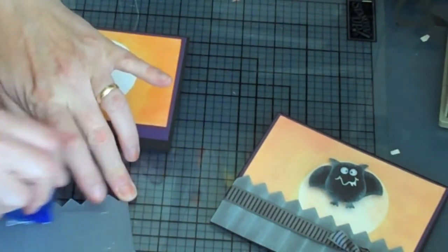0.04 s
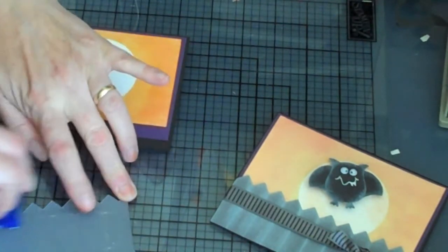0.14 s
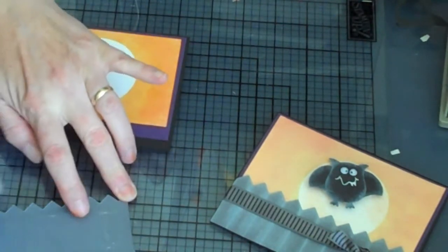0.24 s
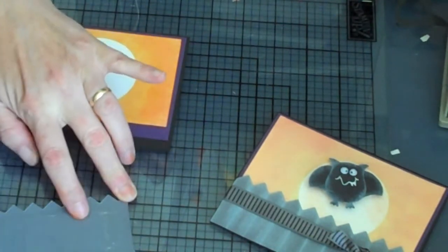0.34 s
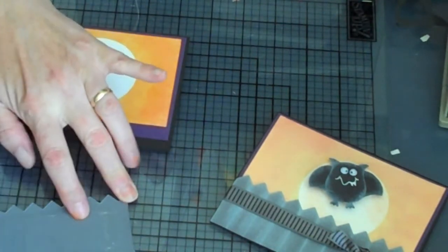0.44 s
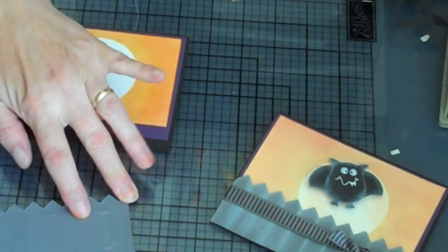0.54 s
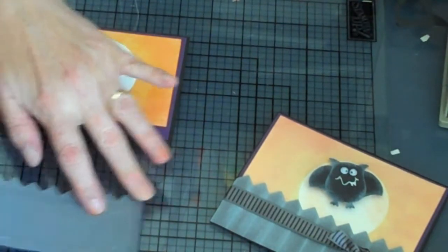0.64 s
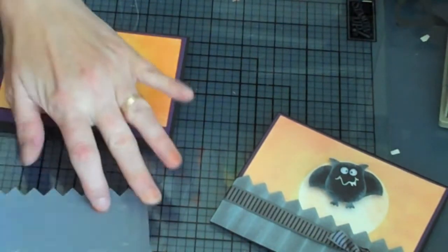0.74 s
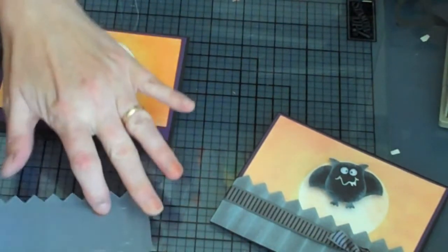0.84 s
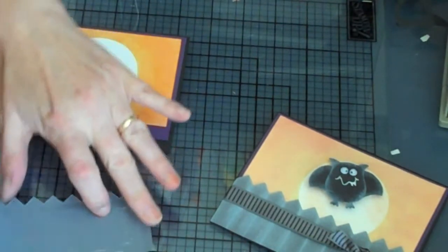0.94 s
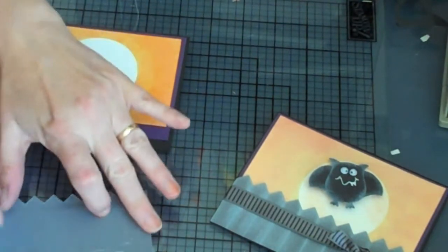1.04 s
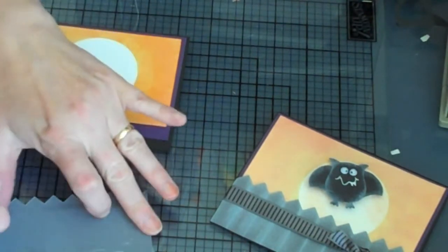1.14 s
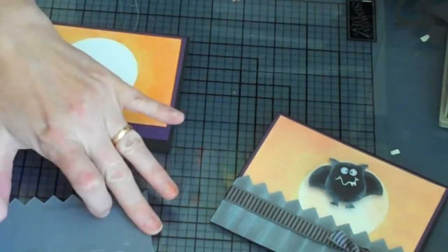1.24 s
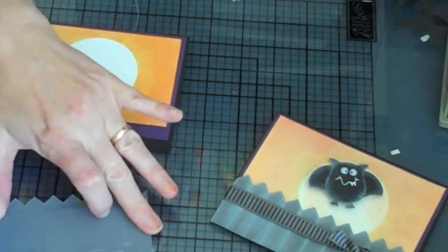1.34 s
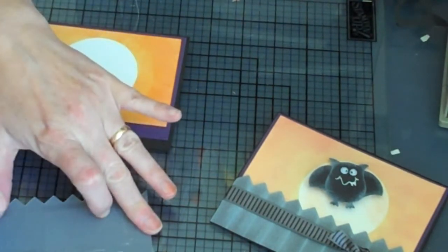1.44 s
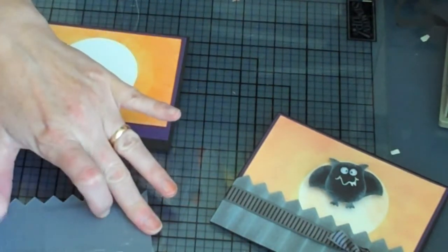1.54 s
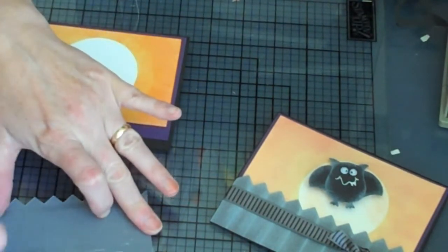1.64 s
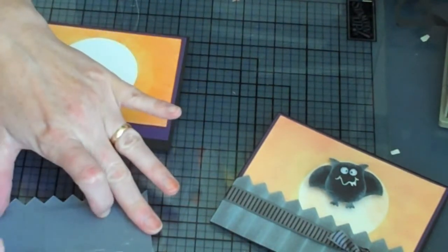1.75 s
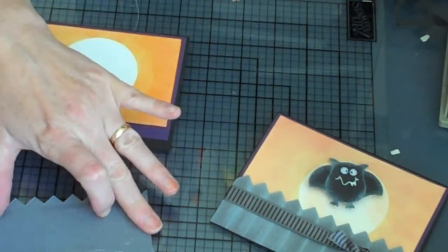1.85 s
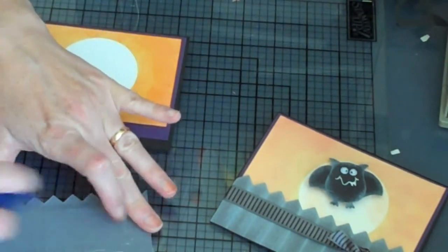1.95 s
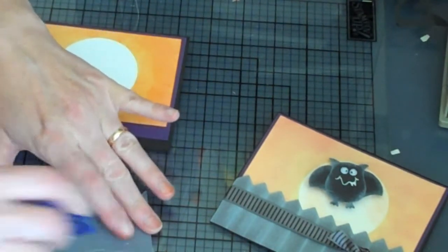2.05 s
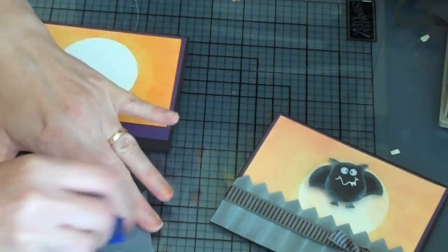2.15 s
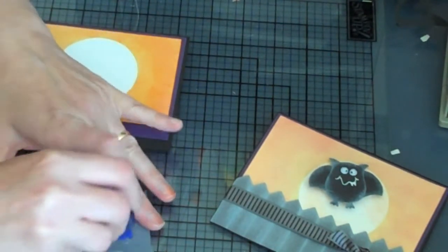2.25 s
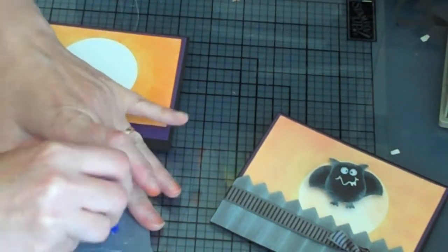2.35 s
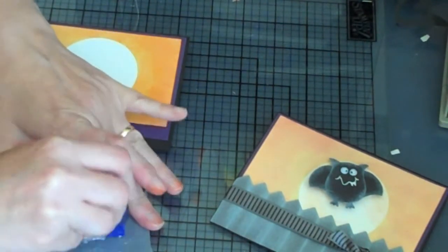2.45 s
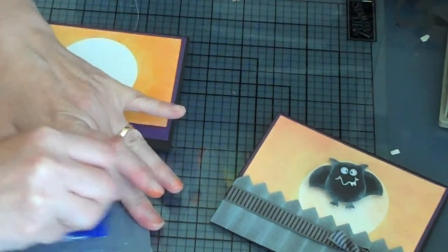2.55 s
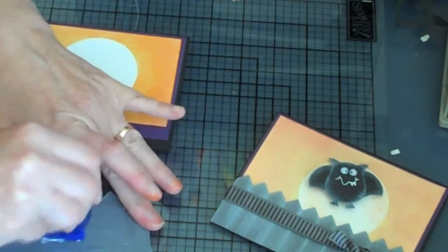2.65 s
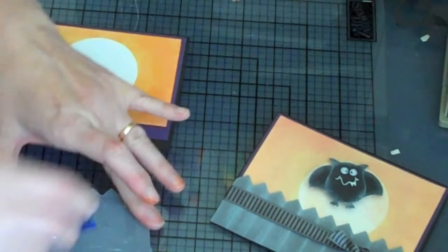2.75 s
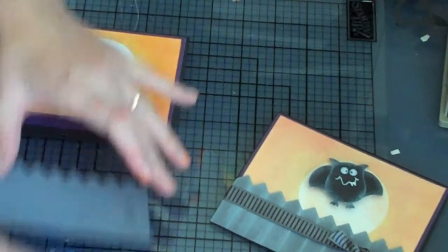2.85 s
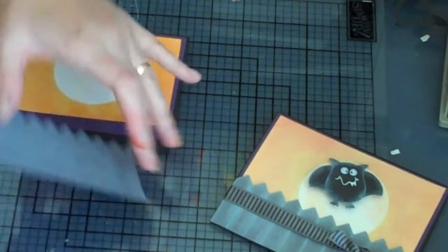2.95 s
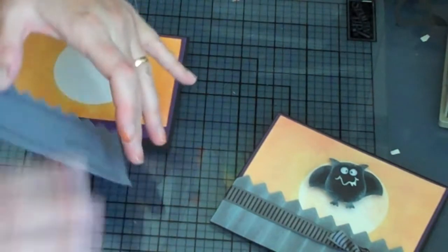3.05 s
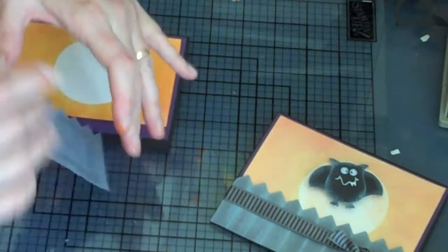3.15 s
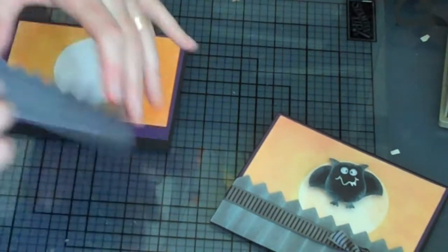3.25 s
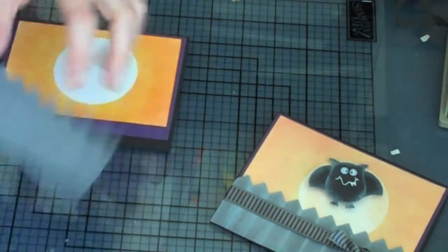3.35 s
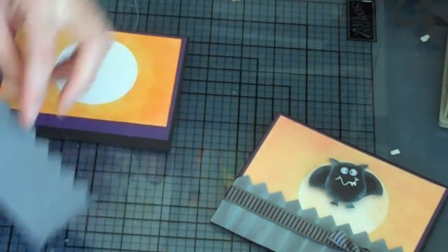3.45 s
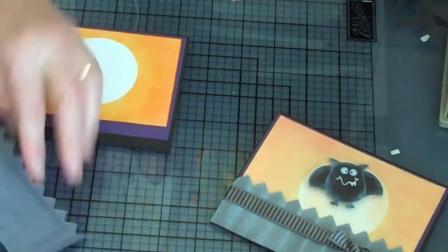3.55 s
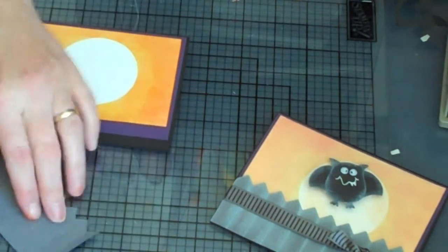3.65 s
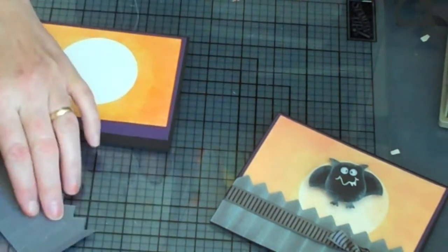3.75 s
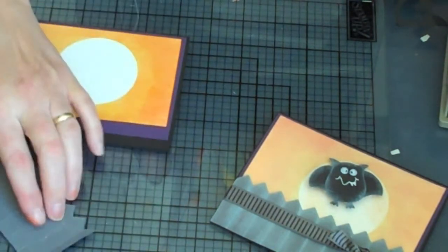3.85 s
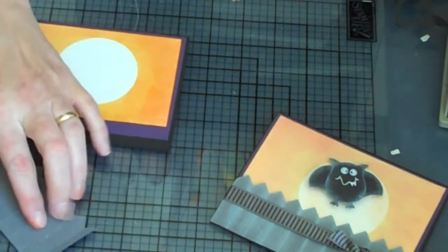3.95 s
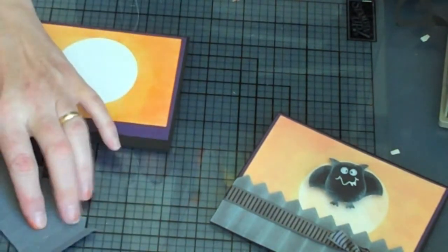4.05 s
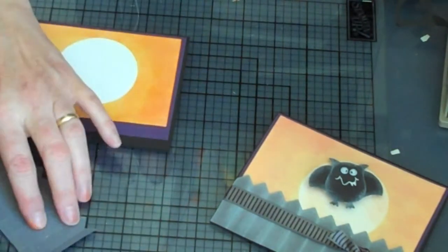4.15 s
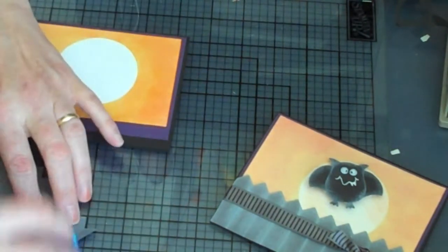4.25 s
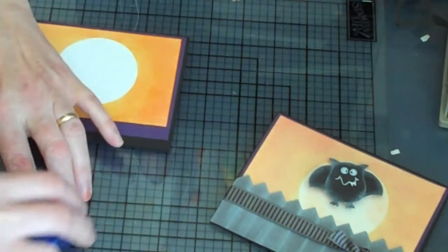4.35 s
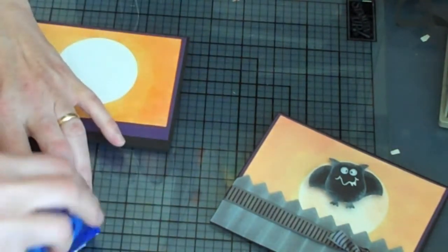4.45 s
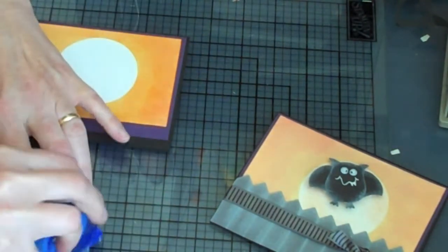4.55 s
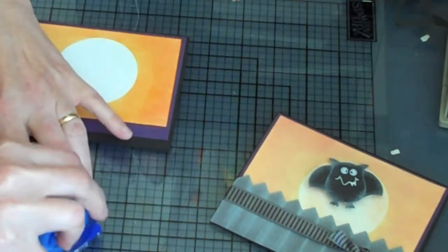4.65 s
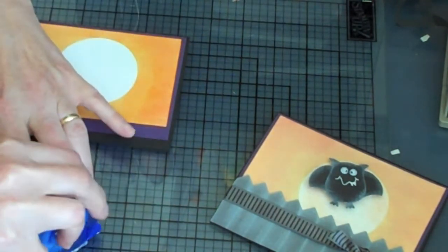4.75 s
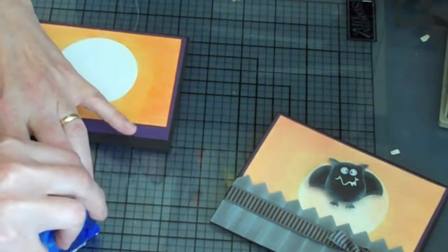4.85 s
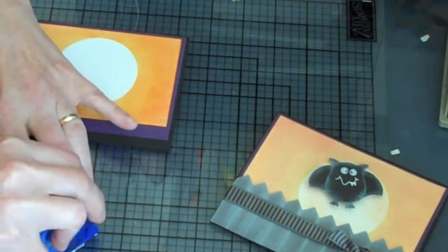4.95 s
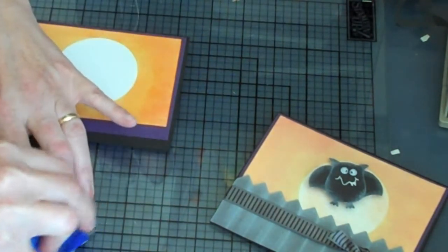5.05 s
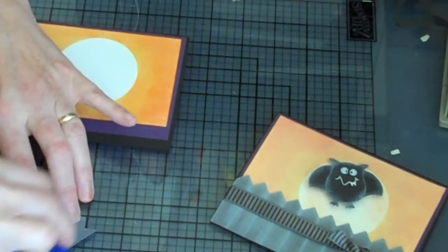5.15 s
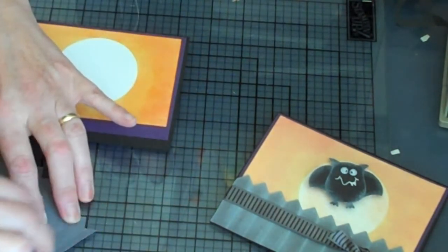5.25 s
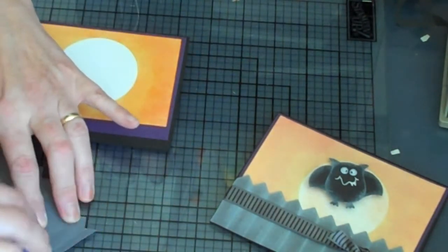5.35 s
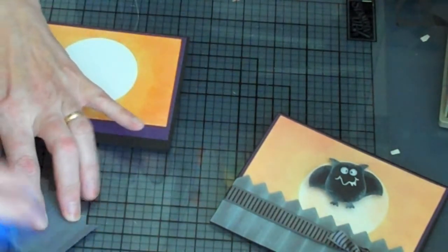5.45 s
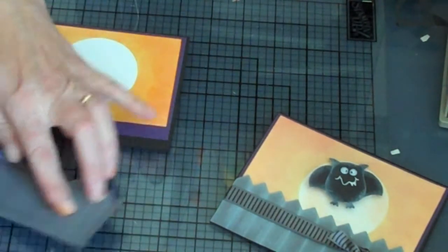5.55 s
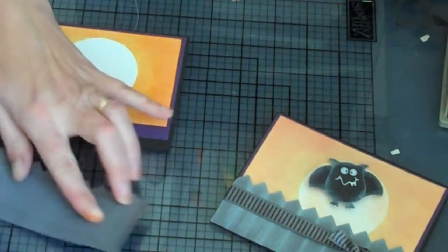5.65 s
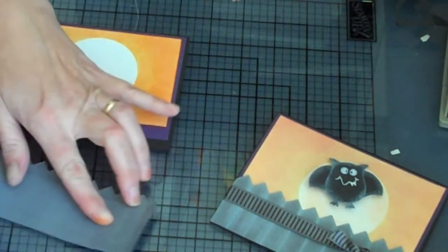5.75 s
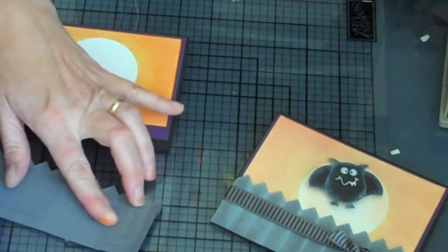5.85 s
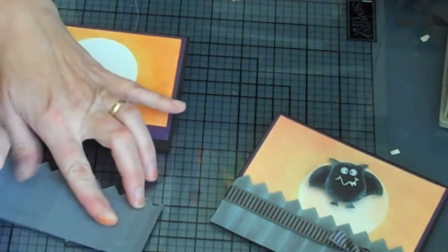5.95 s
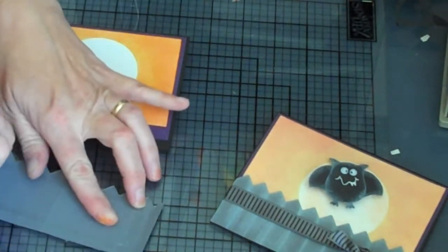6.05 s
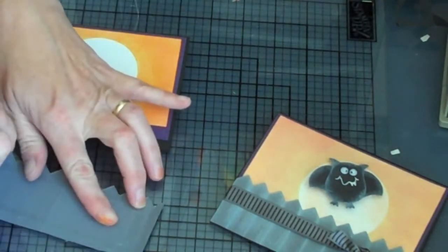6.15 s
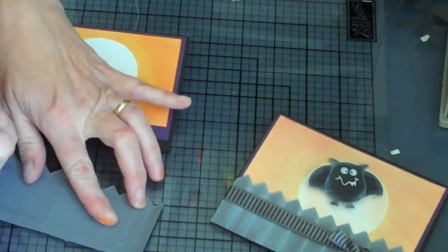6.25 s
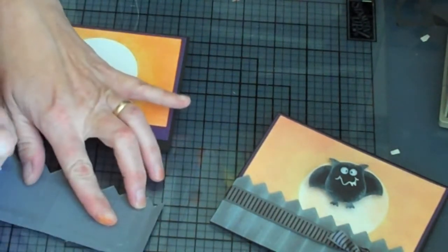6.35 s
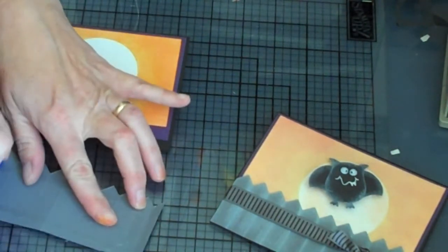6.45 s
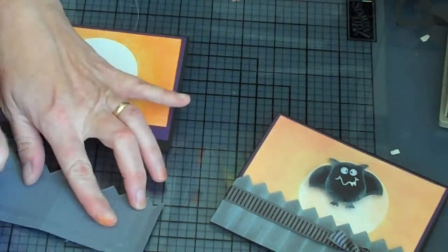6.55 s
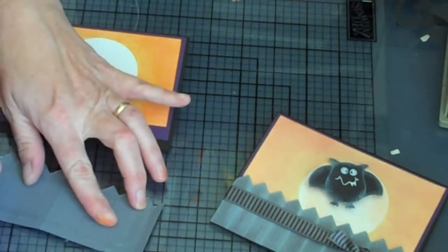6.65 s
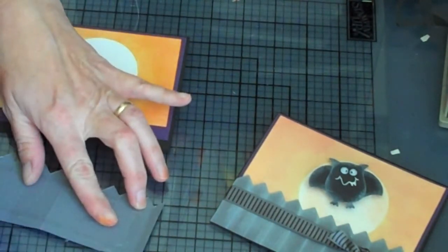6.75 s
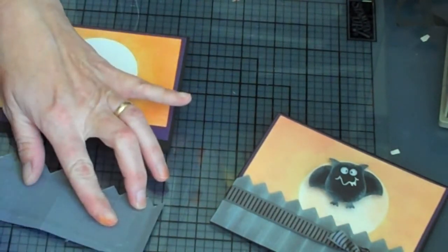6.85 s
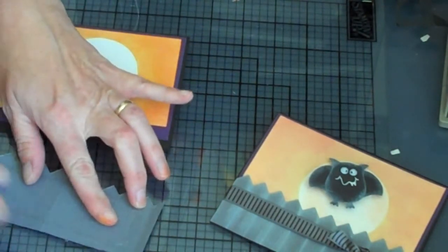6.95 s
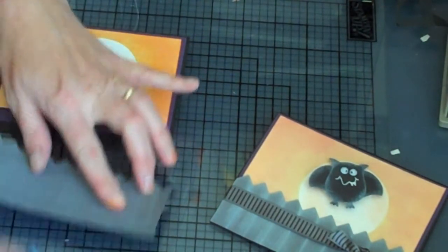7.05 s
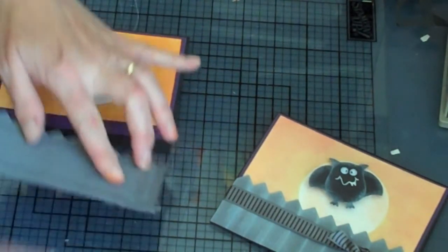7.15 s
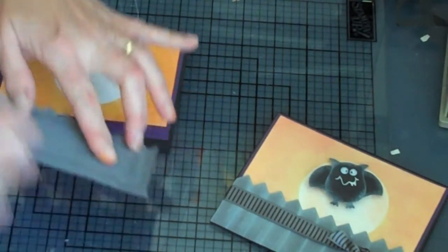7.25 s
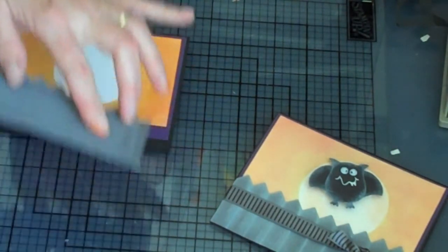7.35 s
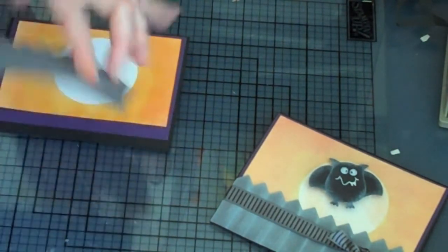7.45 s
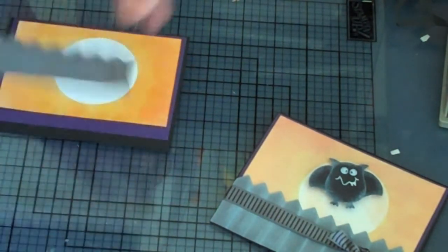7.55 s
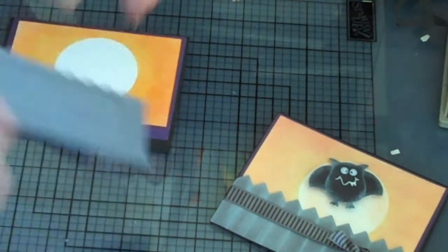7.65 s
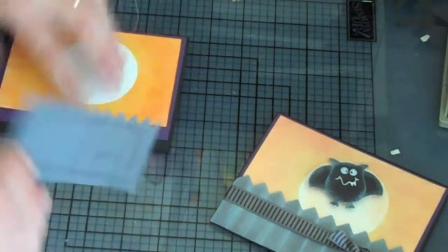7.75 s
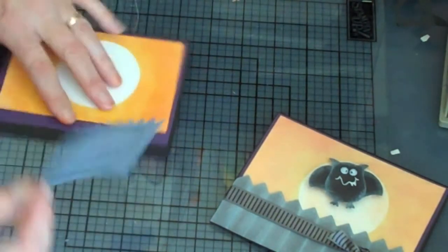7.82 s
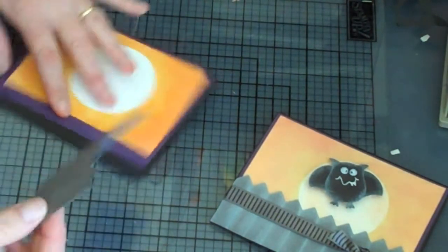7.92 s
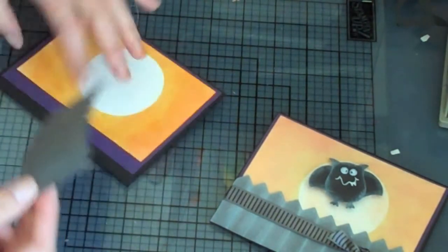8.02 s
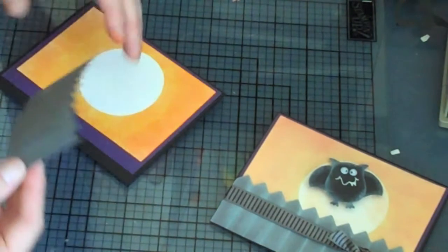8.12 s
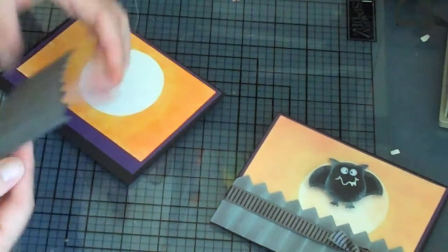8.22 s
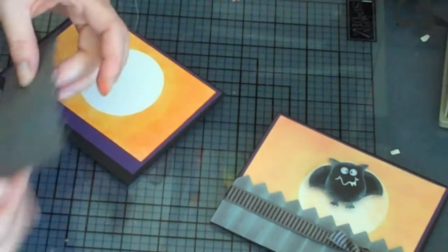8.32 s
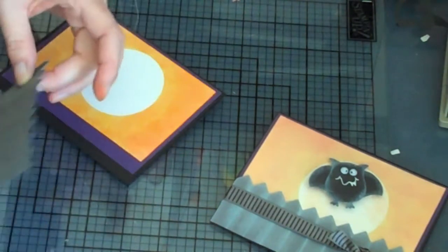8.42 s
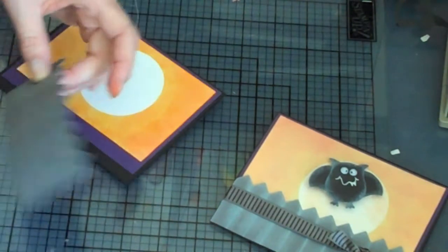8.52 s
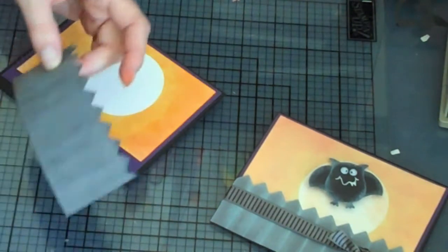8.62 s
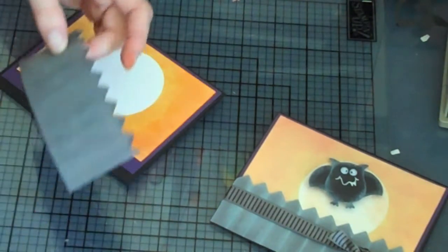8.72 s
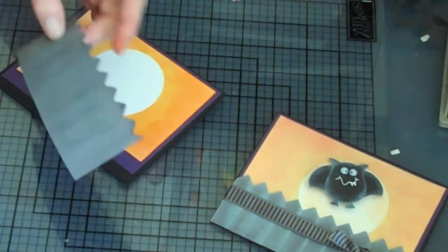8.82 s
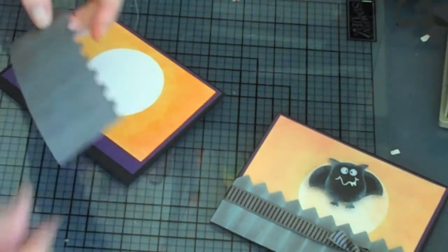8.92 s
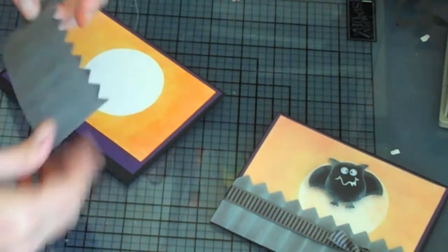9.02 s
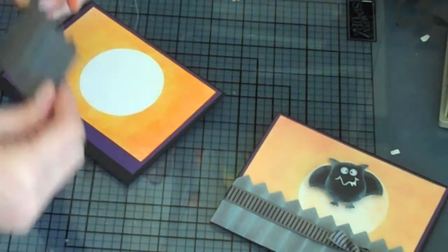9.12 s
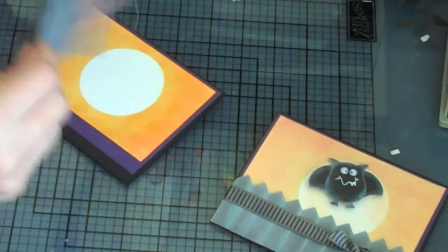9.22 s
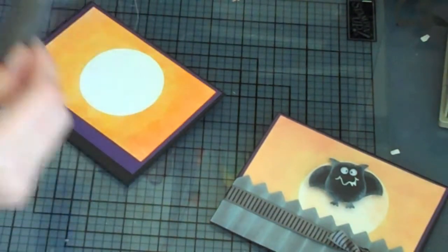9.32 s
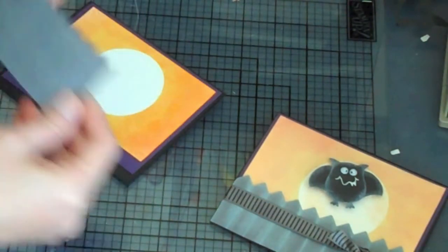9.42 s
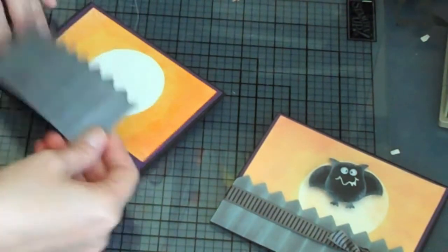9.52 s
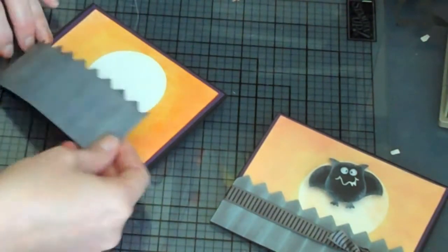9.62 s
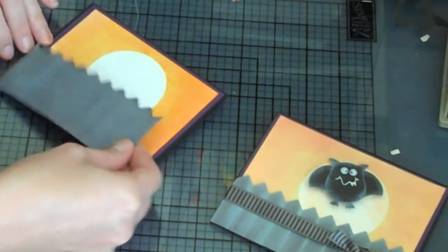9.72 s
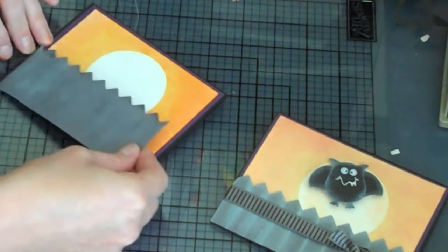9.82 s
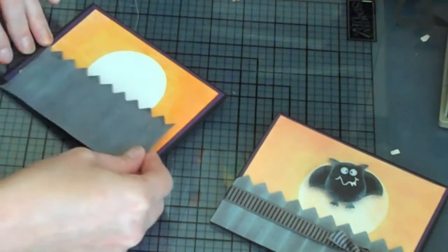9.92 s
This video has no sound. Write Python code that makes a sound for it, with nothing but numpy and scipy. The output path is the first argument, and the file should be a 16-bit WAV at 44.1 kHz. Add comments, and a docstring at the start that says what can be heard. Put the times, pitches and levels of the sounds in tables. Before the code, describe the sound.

A plastic tape runner swipes along cardstock right at the start, a short rasp of rapid ratchet clicks and finely crackling adhesive. The card ticks and fingers rub softly over it. Two more swipes come at about 1.5 and 2.5 seconds. Around 3 seconds the hollow plastic runner clatters loudly onto a cutting mat, with several quick knocks and a low bump from the desk. Light taps, paper ticks and soft sliding follow. The runner rasps again at about 5 seconds and at 6.4 seconds, then clatters down a second time just after 7 seconds. From there until nearly 10 seconds the stiff card is lifted and turned, giving small snaps and airy brushes against the fingers. Everything is close to the microphone in a small, quiet room with a faint steady hiss.

```python
"""A desk in a small quiet room, two microphone capsules close up, each with its own treble resonance.
A plastic tape runner swipes along a strip of cardstock: its ratchet clicks, the tape peels with a fine
crackle. The card ticks, fingers slide over it, and after two more swipes the runner clatters down on
the cutting mat, near 3 s. More handling, another two swipes, and a second clatter near 7 s.
To finish, the card is lifted and turned, ticking and brushing past the fingers."""
import sys
import numpy as np
from scipy import signal
from scipy.fft import rfft, irfft, next_fast_len
from scipy.io import wavfile
from scipy.ndimage import map_coordinates

SR = 44100
rng = np.random.default_rng(int(sys.argv[2]) if len(sys.argv) > 2 else 0)


def wav_record(signal):
    """Record a signal, one row per channel, as 16-bit PCM in the file named by sys.argv[1]."""
    frames = np.transpose(np.atleast_2d(signal))
    bounded = np.clip(frames, -1, 1)
    # unit amplitude maps onto the largest positive 16-bit level
    quanta = np.round(bounded * 32767).astype(np.int16)
    wavfile.write(sys.argv[1], SR, quanta)


N = 440118
TIME, HIT = np.arange(N) / SR, np.arange(8192) / SR  # time axes [s]: the whole scene, one contact
CRUISE_TEETH_PER_S = 70

# the hand pushes the runner along, one curve a push; after a stall it creeps on for a tooth or two:
# (time [s], speed [teeth/s], force [dB])
PUSHES = [
    [(.0054, 57.2, -8.5), (.04, 80.6, -10.5), (.18, 81.4, -11), (.187, 98.1, -13), (.29, 52, -11.5),
     (.395, 5, -12.5)],
    [(1.5, 51.6, -10), (1.567, 103.5, -11.5), (1.589, 76.5, -9.5), (1.67, 27, -10.5)],
    [(1.717, 23, -10.5), (1.764, 19.3, -11), (1.835, 11, -23.5)],
    [(2.503, 53.1, -10.5), (2.518, 105.1, -11), (2.62, 56, -12)],
    [(2.6676, 44, -20), (2.7, 44, -23.5)],
    [(4.961, 36, -11), (5.148, 76.3, -11), (5.164, 51.2, -10.5), (5.252, 37.6, -10)],
    [(6.417, 25.4, -9), (6.444, 47.2, -9), (6.52, 21.2, -11.5), (6.559, 60.9, -11.5), (6.66, 74, -10.5),
     (6.7, 35, -18.5)],
    [(6.8054, 33, -16), (6.845, 33, -10.5)],
]
# modes of the runner's hollow plastic case: (frequency [Hz], width [Hz], level [dB])
CASE_MODES = [(1070, 84, -8.5), (1263, 130, -4), (1566, 210, 5), (1800, 420, 2.5), (2160, 350, 1.5),
              (2703, 170, 2), (3130, 380, -1), (4300, 1600, -3), (5300, 200, 5)]
# modes of the desk under the mat: (frequency [Hz], width [Hz], level [dB])
DESK_MODES = [(155, 69, -2.5), (238, 110, -2), (314.4, 28, 7.5), (556.3, 51, 1.5), (695, 89, -1.5),
              (950, 260, -3)]
# spectrum of a hard, sharp contact: (frequency [Hz], level [dB])
CRACK_SPECTRUM = [(100, -35), (1200, -17), (2500, -11.5), (3600, -2.5), (5200, 0.5), (7000, 1.5),
                  (10000, -4), (14000, -6.5)]
# spectrum of a soft push on the cutting mat: (frequency [Hz], level [dB])
MAT_SPECTRUM = [(20, -10), (65, 1), (110, -8), (200, -4), (320, -21.5), (900, -52.5)]
# spectrum of a brushing card edge: (frequency [Hz], level [dB])
EDGE_SPECTRUM = [(100, -22.5), (1000, -13), (3000, -3.5), (5000, 1), (8000, 3), (14000, -6.5)]


def amp(db):
    """dB to gain."""
    return 10 ** (np.asarray(db) / 20)


def unit(x):
    """Scale to rms 1."""
    return x / np.sqrt(np.mean(x ** 2) + 1e-20)


def along(points, hz):
    """(Hz, value) points read on a log frequency axis."""
    f, v = np.transpose(points)
    return np.interp(np.log(hz + 1), np.log(f + 1), v)


def convolve(x, response):
    """x through an impulse response, at its own length."""
    return signal.oaconvolve(np.atleast_2d(x), np.atleast_2d(response), axes=-1)[:, :x.shape[-1]]


def colour(points):
    """Minimum-phase impulse response with the given (Hz, dB) spectrum."""
    n = len(HIT)
    cepstrum = irfft(np.log(amp(along(points, np.fft.rfftfreq(n, 1 / SR)))))
    cepstrum[1:n // 2] *= 2
    cepstrum[n // 2 + 1:] = 0
    return irfft(np.exp(rfft(cepstrum)))


def resonator(modes):
    """Impulse response of (Hz, width, dB) resonances, alternating in sign."""
    f = np.fft.rfftfreq(len(HIT), 1 / SR)
    return irfft(sum((-1) ** k * amp(db) * 1j * f * width / (hz * hz - f * f + 1j * f * width)
                     for k, (hz, width, db) in enumerate(modes)))


def struck(modes, focus_hz, slope_db):
    """The spot that a blow lands on favours the modes near one frequency, by slope_db an octave."""
    return resonator([(hz, width, db - slope_db * abs(np.log2(hz / focus_hz)))
                      for hz, width, db in modes])


def noise(points):
    """Coloured noise of rms 1."""
    return unit(convolve(rng.standard_normal(N), colour(points)))


def stereo_noise(n):
    """White noise as the two capsules hear it: most alike in the low mids, less so in the treble."""
    # likeness of left and right: (frequency [Hz], correlation [0-1])
    likeness = [(60, .7), (250, 0.99), (1500, 0.98), (3000, .85), (5000, 0.67), (7000, 0.78), (12000, 0.9)]
    turn = np.arccos(along(likeness, np.fft.rfftfreq(n, 1 / SR))) / 2
    mid, side = irfft(rfft(rng.standard_normal((2, n))) * [np.cos(turn), np.sin(turn)], n)
    return np.array([mid + side, mid - side])


def burst(body, t60, attack, scatter_db):
    """A contact chatters briefly and rings a body; things on the desk scatter a weak tail after it."""
    decay = amp(-60 * HIT / t60) + amp(scatter_db - 60 * HIT / 0.16)
    rise = 1 - np.exp(-HIT / attack)
    return unit(convolve(stereo_noise(len(HIT)) * decay * rise, body))


def crackle(points, grain_rate, spread_db):
    """Tiny bonds let go with unequal strengths, grain_rate times a second; rms 1."""
    hiss = stereo_noise(next_fast_len(N))[:, :N]
    strengths = rng.standard_normal(int(N * grain_rate / SR) + 4)
    flicker_db = spread_db * map_coordinates(strengths, [TIME * grain_rate])
    return unit(convolve(hiss * amp(flicker_db), colour(points)))


def add(track, s, sound):
    """Mix a sound in at time s."""
    part = track[:, max(round(s * SR), 0):][:, :sound.shape[1]]
    part += sound[:, :part.shape[1]]


def room_tone():
    """Faint room rumble, and a separate hush of air at each capsule."""
    # spectra of the rumble and the air: (frequency [Hz], level [dB])
    rumble = [(20, 7.5), (60, -3.5), (120, -2.5), (250, -7), (600, -18.5), (2000, -35), (14000, -55)]
    air = [(30, 0), (3000, 2.5), (7500, -0.5), (14000, -4.5)]
    return amp(-77.5) * noise(rumble) + amp(-62.5) * np.vstack([noise(air), noise(air)])


def motion(push):
    """Times, speed and force during one push, sample by sample."""
    s, speed, force_db = np.transpose(push)
    t = np.arange(s[0], s[-1], 1 / SR)
    return t, np.interp(t, s, speed), np.interp(t, s, force_db)


def teeth(spread_db):
    """(s, dB) of each snap, no two alike: one as a push starts, then one for every tooth of travel."""
    for push in PUSHES:
        t, speed, force_db = motion(push)
        passed = np.floor(np.cumsum(speed) / SR)
        for i in np.flatnonzero(np.diff(passed, prepend=-1)):
            yield t[i], force_db[i] + spread_db * rng.standard_normal()


def ratchet():
    """Each tooth flicks the pawl, which rings the hollow case and, faintly, the desk."""
    # spectrum of the pawl's snap: (frequency [Hz], level [dB])
    pawl_spectrum = [(60, -32.5), (130, -34.5), (300, -29), (800, -22), (1200, -14), (2200, -5.5),
                     (3200, -5), (4500, 2.5), (6000, 6.5), (8000, 0.5), (14000, 0)]
    out, pawl = np.zeros((2, N)), colour(pawl_spectrum)
    case, desk = struck(CASE_MODES, 1560, slope_db=3.5), struck(DESK_MODES, 550, slope_db=5.5)
    for s, db in teeth(spread_db=1.0):
        snap = amp(-23) * burst(pawl, t60=0.016, attack=0.0025, scatter_db=-19.5)
        ring = amp(-34) * burst(case, t60=0.014, attack=0.0031, scatter_db=-20)
        thump = amp(-62) * burst(desk, t60=0.02, attack=0.002, scatter_db=-19)
        add(out, s, amp(db) * (snap + ring + thump))
    return out


def tape_peel():
    """Adhesive tears from its carrier, louder with speed and force; the case resonates with it."""
    release_s = 0.025  # the tape still lets go after the hand stops
    gain = np.zeros(N)
    for push in PUSHES:
        t, speed, force_db = motion(push)
        level = amp(force_db - 24.5) * (speed / CRUISE_TEETH_PER_S) ** 0.9
        gain += np.interp(TIME, np.append(t, t[-1] + release_s), np.append(level, 0), left=0)
    # spectrum of the tearing adhesive: (frequency [Hz], level [dB])
    tape_spectrum = [(60, -22), (700, -23.5), (1100, -5), (1550, 2), (2100, -4.5), (3200, 2), (5000, 2.5),
                     (8000, 2.5), (14000, -1)]
    tearing = crackle(tape_spectrum, grain_rate=1200, spread_db=3)
    hollow = amp(-13.5) * unit(convolve(tearing, resonator(CASE_MODES)))
    hand_rumble = amp(-34) * noise(MAT_SPECTRUM)
    return gain * (tearing + hollow + hand_rumble)


def card_ticks():
    """Stiff card scuffs along a nail, then slips off in a very short snap; the bent patch sets its pitch."""
    # the card snaps under the fingers: (time [s], level [dB], ring of the patch [dB], pitch [Hz])
    ticks = [(.498, -12.5, -29.5, 1510), (.537, -5.5, -26.5, 5600), (1.468, -27.5, -23.5, 1490),
             (2.032, -33, -34, 870), (2.115, -16, -20, 3370), (2.26, -32, -25, 2170),
             (3.382, -11.5, -27.5, 1295), (3.592, -18.5, -21, 3430), (3.612, -21, -22.5, 2910),
             (3.925, -12.5, -40, 1780), (5.345, -19, -30, 2713), (5.36, -12.5, -34, 2873),
             (5.87, -30.5, -23, 2930), (5.921, -14.5, -28, 3360), (6.239, -34.5, -15.5, 4360),
             (7.382, -6, -16.5, 2933), (7.475, -9, -32, 2204), (7.746, -28.5, -18, 1540),
             (8.219, -17.5, -18.5, 2930), (8.263, -16, -34, 1260), (8.341, -15, -23, 3020),
             (9.008, -29.5, -23, 1150), (9.173, -19.5, -14.5, 3280), (9.52, -26.5, -12.5, 2140)]
    # spectrum of the whole card flexing faintly with the patch: (frequency [Hz], level [dB])
    flex_spectrum = [(50, -15), (200, -6), (450, 0), (850, 3), (1300, 9), (4000, -56)]
    out, crack, flex = np.zeros((2, N)), colour(CRACK_SPECTRUM), colour(flex_spectrum)
    for s, db, ring_db, hz in ticks:
        patch = resonator([(0.83 * hz, 0.74 * hz, -4), (hz, 0.5 * hz, 0), (1.55 * hz, 0.2 * hz, -7)])
        thump = amp(ring_db - 27.5) * burst(flex, t60=0.047, attack=0.00054, scatter_db=-3.5)
        pop = amp(ring_db - 13) * burst(patch, t60=0.008, attack=0.0022, scatter_db=-28)
        snap = amp(-26) * burst(crack, t60=0.0065, attack=0.0009, scatter_db=-34)
        scuff = amp(-36) * burst(crack, t60=0.1, attack=0.0082, scatter_db=-19)
        add(out, s - 0.007, amp(db) * scuff)
        add(out, s + 0.0006, amp(db) * (thump + pop + snap))
    return out


def swells(strokes, shape):
    """Gain of strokes that each gather speed and slow down again in one arch."""
    progress, arch = np.linspace(0, 1, 33), np.hanning(33) ** shape
    return sum(amp(db) * np.interp(TIME, start + length * progress, arch)
               for start, length, db in strokes)


def card_slides():
    """Paper fibres catch under the pressing fingers; a free card edge brushes more brightly."""
    # skin and card slide over card: (start [s], length [s], level [dB])
    slides = [(.53, 0.75, -54.5), (2.3, 0.1, -57), (2.72, 0.16, -53), (3.42, 0.49, -55), (4.01, 0.093, -51),
              (4.66, 0.22, -60.5), (5.38, 0.68, -54.5), (6.28, 0.14, -59)]
    # spectrum of that rubbing: (frequency [Hz], level [dB])
    rub_spectrum = [(100, -30.5), (1000, -13.5), (3000, -10.5), (4500, 1.5), (5800, 1.5), (7500, -1.5),
                    (10000, -7.5), (14000, -15)]
    # the lifted card brushes past the fingers: (start [s], length [s], level [dB])
    brushes = [(3.525, 0.058, -42), (7.83, .12, -50.5), (8.1, 0.052, -53.5), (8.27, 0.092, -37.5),
               (8.43, 0.066, -55.5), (8.6, 0.047, -58), (8.82, .06, -58.5), (9.75, 0.047, -59),
               (9.84, 0.14, -60.5)]
    pressed = swells(slides, shape=0.26) * crackle(rub_spectrum, grain_rate=230, spread_db=2.5)
    brushed = swells(brushes, shape=0.4) * crackle(EDGE_SPECTRUM, grain_rate=280, spread_db=1.5)
    return pressed + brushed


def case_contacts():
    """Each knock and, where the case rocks back, its rebound: later after a stronger blow."""
    # the runner is picked up, set on the card or dropped: (time [s], level [dB], hardness as crack
    # over case ring [dB], desk thump [dB], rebound [0-1], mode favoured by the struck spot [Hz])
    knocks = [(0.644, -29, 2.5, -36, 0.01, 1800), (0.707, -33, -9.5, -32, .8, 1790),
              (1.341, -22, -2.5, -35.5, 0.99, 1710), (2.306, -33.5, 7, -29, 0, 2011),
              (2.414, -22.5, 3.5, -28, 1, 1700), (2.891, -4, 10.5, -36, 0.03, 1800),
              (2.937, 3.5, 6, -34, 0, 1701), (2.982, 4, 8, -29, 0.16, 2690),
              (3.032, -9, -0.5, -34, 0, 1710), (3.056, 6, 3.5, -36, 0, 1699),
              (3.184, -25, 10.5, -30, 0.01, 1500), (3.839, -24.5, 5, -36, 0.02, 2997),
              (3.863, -18, 11, -30.5, 0.01, 1602), (3.878, -17, 8.5, -28.5, 0.46, 2030),
              (3.977, -28, -11, -28.5, 1, 1750), (4.09, -10, 9.5, -23, 0.41, 1660),
              (4.204, -17, 5.5, -42, 0.72, 2660), (4.244, -25, 6.5, -48, 0.03, 1630),
              (4.326, -35, 21, -35, 0.02, 2900), (4.52, -25, -3, -40, 0, 1660),
              (4.561, -23.5, -3, -55, 0, 1868), (4.643, -18.5, 0.5, -44, 0.22, 1440),
              (4.898, -32.5, -4, -28, 0.01, 1493), (5.332, -25.5, 9, -39, 0.01, 1642),
              (5.379, -28.5, 11.5, -28.5, 0, 1447), (6.177, -30, 8, -44.5, 0.05, 4402),
              (7.056, 0, 11.5, -37, 0, 2100), (7.104, -2.5, 7, -28, 0, 2700),
              (7.122, -2.5, -2, -35, 0.03, 1961), (7.136, 2, 18, -29, 0.01, 2680),
              (7.157, -8.5, 0, -28, .5, 1938), (7.216, -3.5, 6, -34.5, 0, 1920),
              (7.247, -7.5, -1, -35, 0.02, 1780), (7.381, -21, 2, -16, 0, 1300)]
    for s, db, hard_db, thump_db, rebound, hz in knocks:
        strength = amp(db)
        yield s, strength, hard_db, thump_db, hz
        if rebound > 0:
            flight_s = 0.026 * strength ** 0.2
            yield s + flight_s, rebound * strength, hard_db, thump_db, hz


def case_knocks():
    """An edge grazes first, then the case cracks down: the plastic rings briefly, the desk longer."""
    out, crack = np.zeros((2, N)), colour(CRACK_SPECTRUM)
    for s, strength, hard_db, thump_db, case_hz in case_contacts():
        soft = strength ** -0.18  # lighter touches land more gradually
        desk = struck(DESK_MODES, 500 / strength ** 0.27, slope_db=3.5)  # heavy blows reach lower modes
        case = struck(CASE_MODES, case_hz, slope_db=5.5)
        thump = burst(desk, t60=0.05, attack=0.0025, scatter_db=-16)
        ring = burst(case, t60=0.018 * soft, attack=0.00058 * soft, scatter_db=-15)
        snap = burst(crack, t60=0.019 * soft, attack=0.0007 * soft, scatter_db=-19)
        graze = amp(hard_db / 2 - 59) * soft * burst(crack, t60=0.026, attack=0.0011, scatter_db=-21)
        blow = amp(thump_db - 10.5) * thump + amp(-hard_db / 2 - 27) * ring + amp(hard_db / 2 - 27) * snap
        add(out, s - 0.011, strength * graze)
        add(out, s, strength * blow)
    return out


def mat_bumps():
    """Soft pushes on the mat reach the desk as low thuds."""
    # a hand or the runner presses on the mat: (time [s], level [dB])
    bumps = [(1.343, -47), (2.411, -50), (2.983, -37), (3.057, -50), (4.094, -58), (4.529, -65),
             (6.168, -64.5), (7.135, -44), (7.768, -52.5), (9.489, -60.5)]
    out, mat = np.zeros((2, N)), colour(MAT_SPECTRUM)
    for s, db in bumps:
        add(out, s, amp(db - 11) * burst(mat, t60=0.17, attack=0.0038, scatter_db=-21))
    return out


def tip_creak(rise_s):
    """The gripping tip creaks on the card, through the case, ever louder until the tape starts to run."""
    grip = crackle(EDGE_SPECTRUM, grain_rate=540, spread_db=6.5)
    creak = unit(convolve(grip, resonator(CASE_MODES)))
    gain, rise = np.zeros((1, N)), np.exp(-HIT[::-1] / rise_s)[None]
    for push in PUSHES:
        s, speed, force_db = push[0]
        if s > HIT[-1]:
            level = amp(force_db - 13) * (speed / CRUISE_TEETH_PER_S) ** 2  # a brisk start creaks more
            add(gain, s - HIT[-1], level * rise)
    return gain * creak


def with_reflections(x):
    """The first hard reflections comb the direct sound, a little differently at each capsule."""
    # off the desk and nearby things: (left delay [s], right delay [s], level [dB])
    bounces = [(.00118, 0.0013, -22.5), (.00260, .00256, -22.5), (.0042, 0.0073, -18), (.0073, 0.0082, -15)]
    n = next_fast_len(N + len(HIT))
    hz = np.fft.rfftfreq(n, 1 / SR)
    comb = 1 + sum(amp(db) * np.exp(-2j * np.pi * np.outer([left, right], hz))
                   for left, right, db in bounces)
    return irfft(rfft(x, n) * comb, n)[:, :N]


def reverb(x, onset_s):
    """The walls' diffuse answer, dying at its own speed in each band."""
    # decay of the small room: (frequency [Hz], t60 [s])
    decay_times = [(150, 0.46), (600, 0.41), (1700, .3), (4000, .36), (7000, 0.33), (13000, 0.54)]
    hz, t, bands = signal.stft(stereo_noise(SR * 2 // 3), SR, nperseg=256)
    decay = amp(-60 * t / along(decay_times, hz)[:, None])
    _, tail = signal.istft(bands * decay, SR, nperseg=256)
    tail *= 1 - np.exp(-np.arange(tail.shape[1]) / SR / onset_s)
    return convolve(x, tail / np.linalg.norm(tail[0]))


def scene():
    """All the handling at one spot on the desk, close to the microphones, with the room well behind."""
    swipes = tip_creak(rise_s=0.01) + ratchet() + tape_peel()
    direct = swipes + case_knocks() + card_ticks() + mat_bumps() + card_slides()
    return amp(-0.5) * with_reflections(direct) + amp(-15) * reverb(direct, onset_s=0.0043) + room_tone()


def record(dry):
    """Each capsule adds its resonance and each preamp its hiss; the loudest knocks clip."""
    # capsule responses: (frequency [Hz], gain [dB])
    mic_left = [(1000, 1), (4000, -0.5), (6200, -0.5), (7200, 10.5), (8500, 1), (10000, -5), (14200, -8),
                (14900, -35)]
    mic_right = [(1000, 0.34), (4000, -1), (5200, -0.5), (6100, 6.5), (7200, -2), (8500, -11.5),
                 (10000, -18.5), (14200, -31.5), (14900, -42.5)]
    # preamp hiss spectra: (frequency [Hz], level [dB])
    hiss_left = [(30, 7.5), (200, 14), (480, 14.5), (1000, 12), (2000, 8), (4000, 5.5), (8000, 0.5),
                 (14200, -2), (14600, -36)]
    hiss_right = [(30, 4), (300, 1), (1500, -1.5), (5000, 0), (9000, -1.5), (14200, -1.5), (14600, -35.5)]
    align_s = 0.000014  # a tiny delay on the left keeps both channels in step, so the sound stays centred
    top_hz, skirt_hz = 15500, 800
    heard = convolve(dry, np.array([colour(mic_left), colour(mic_right)]))
    hiss = np.vstack([amp(-57.5) * noise(hiss_left), amp(-64) * noise(hiss_right)])
    clipped = np.clip(heard + hiss, -1, 1)
    n = next_fast_len(N)
    hz = np.fft.rfftfreq(n, 1 / SR)
    align = np.exp(-2j * np.pi * np.outer([align_s, 0], hz))
    lowpass = np.clip((top_hz - hz) / skirt_hz + 0.5, 0, 1)
    return irfft(rfft(clipped, n) * align * lowpass, n)[:, :N]


dry = scene()
out = record(dry)
wav_record(out)
```